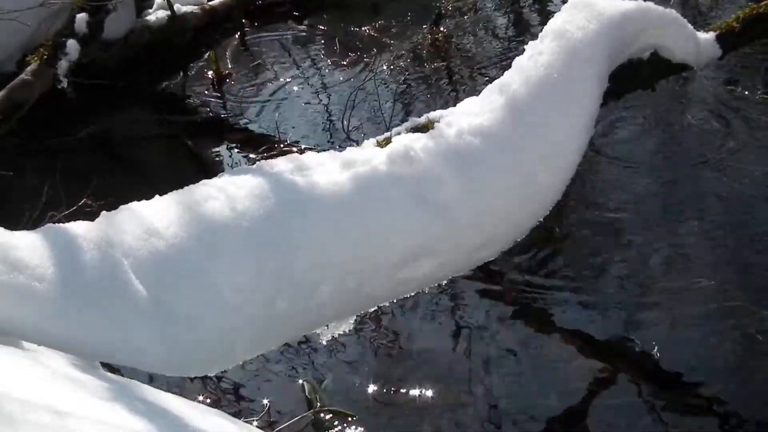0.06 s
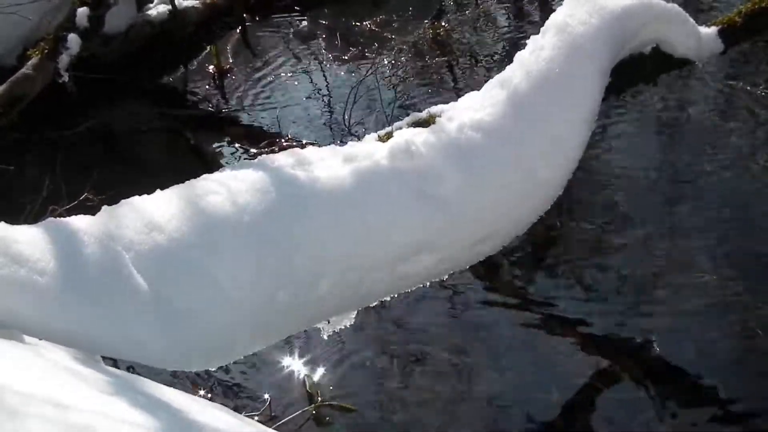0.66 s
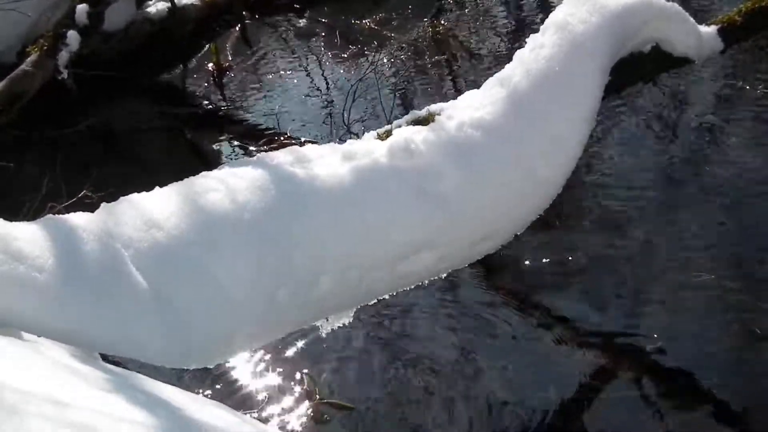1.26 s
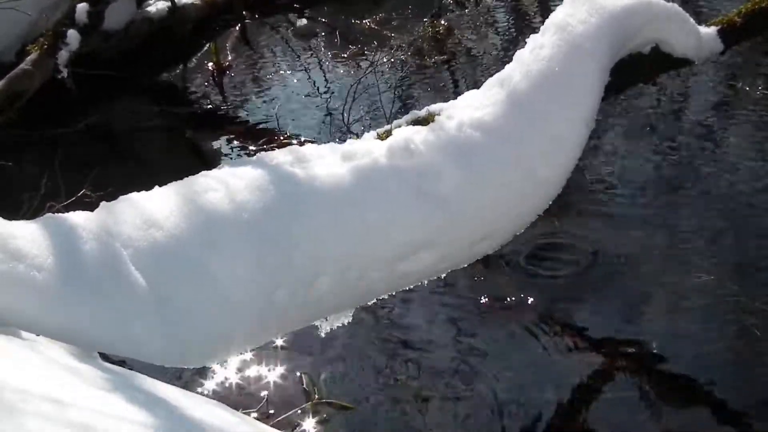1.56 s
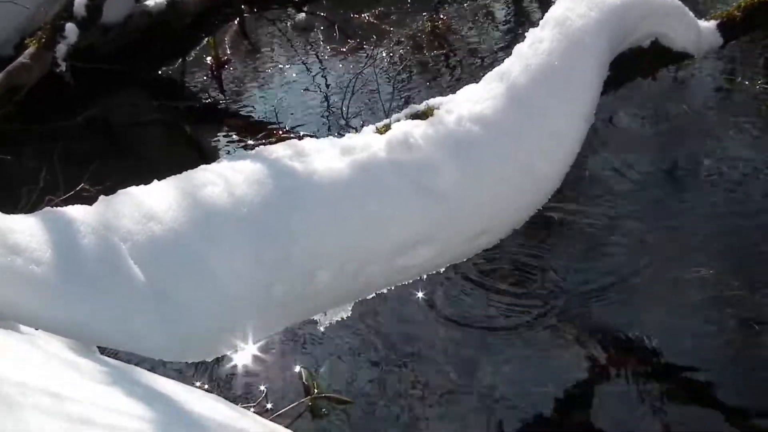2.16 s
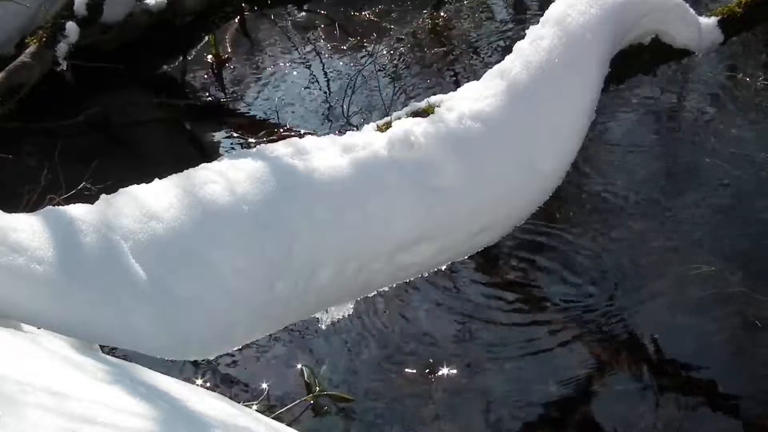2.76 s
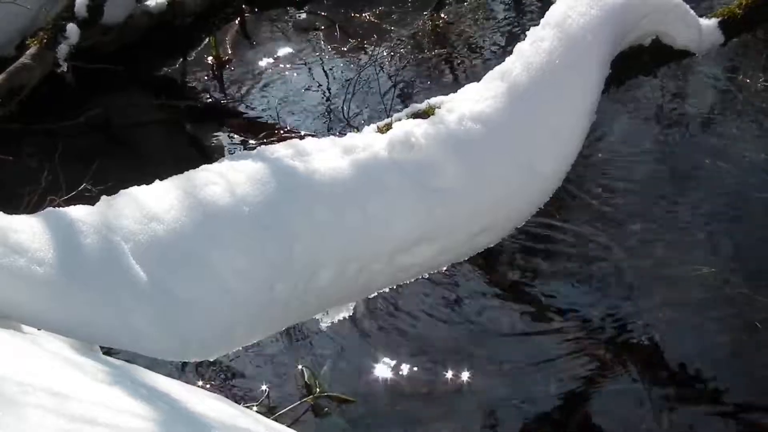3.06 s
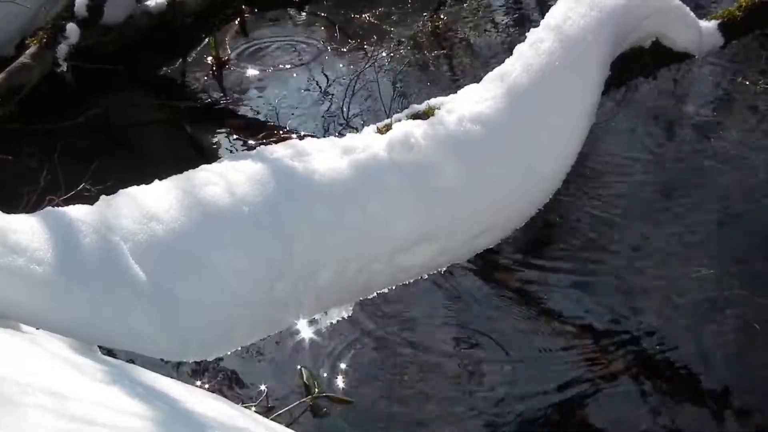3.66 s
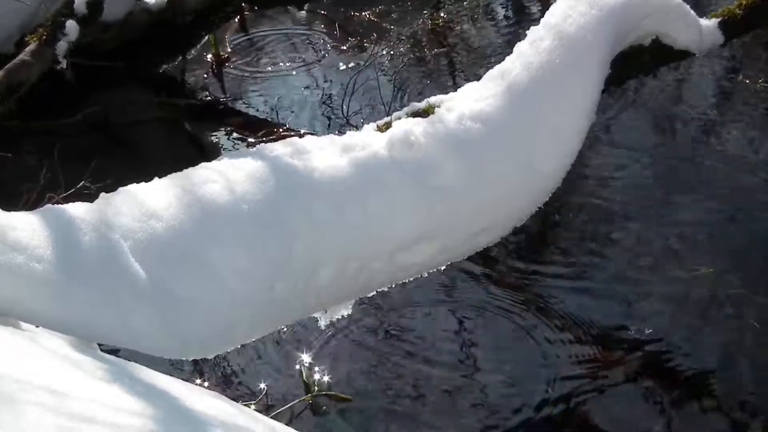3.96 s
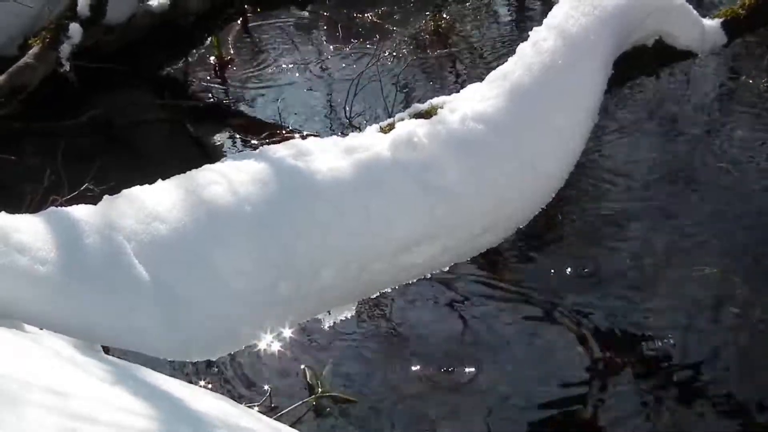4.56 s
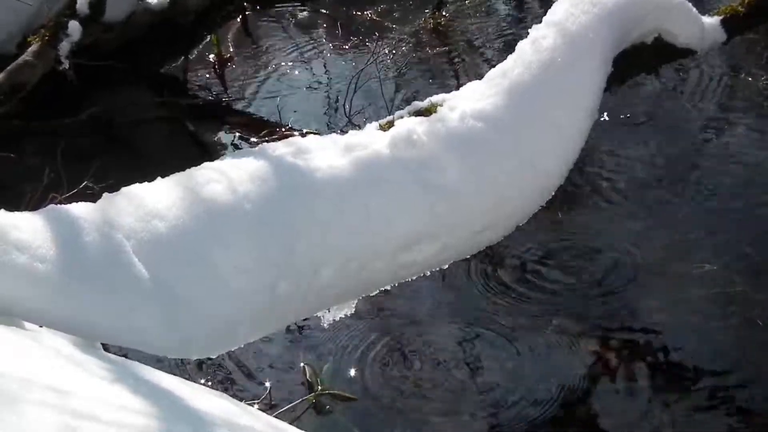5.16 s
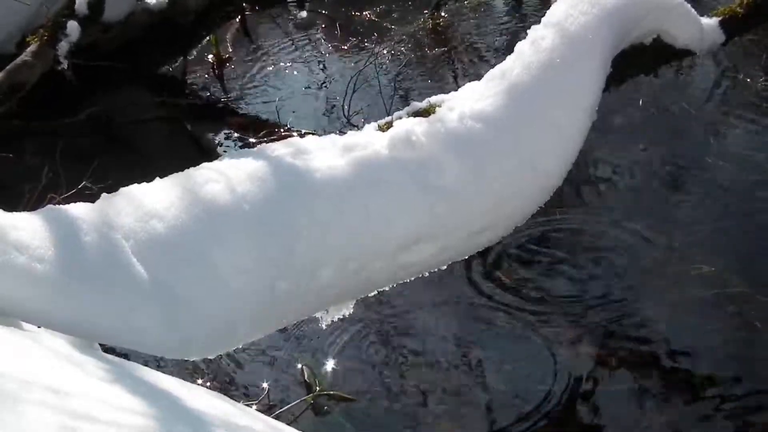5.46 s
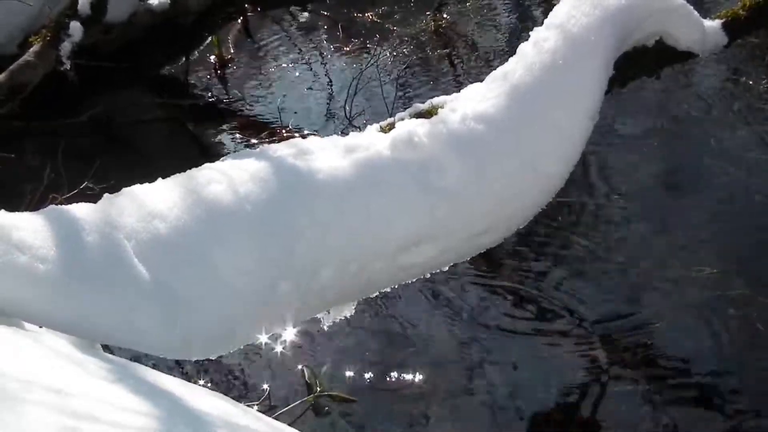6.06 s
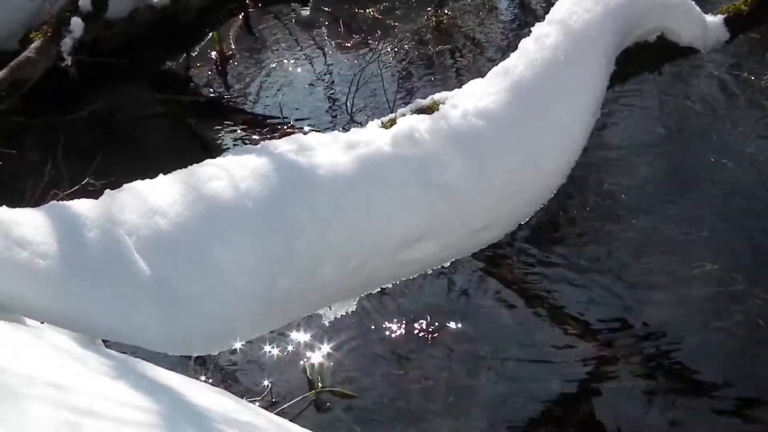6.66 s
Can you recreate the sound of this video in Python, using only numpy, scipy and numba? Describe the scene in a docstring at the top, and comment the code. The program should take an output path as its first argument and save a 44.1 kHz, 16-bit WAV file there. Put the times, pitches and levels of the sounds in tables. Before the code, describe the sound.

A distant stream hisses softly and steadily outdoors for the whole seven seconds or so. Faint drops of meltwater fall irregularly into a pool, making small ticks and short, bubbly plinks, with clearer ones at about 1.2, 2.5 and 3.8 seconds. A very faint, high camera motor whine pulses nearly four times a second throughout. At first, only light puffs of breeze touch the microphone. From about 3 seconds the wind rises, and by 4 seconds it is a loud, low, fluttering rumble with hard thumps, mostly on the right side. The strongest blows come at around 4.2, 4.7 and 5.4 to 6 seconds, and the water sound dips under each one. The wind eases briefly near 6.5 seconds, then gusts again at about 6.8 seconds, with a couple of sharp drips ticking through it.

```python
"""A far stream hisses under a faint breeze; a small camera motor ticks with a faint, high whine.
Meltwater drips from a snowy log into a pool: drops crack on the surface, some ring a trapped bubble.
Halfway through, the wind rises and its eddies buffet the right microphone port; the left is sheltered.
A limiter ducks the water under each hard blow."""
import sys
import numpy as np
from scipy import signal
from scipy.fft import rfft, irfft
from scipy.io import wavfile
from scipy.ndimage import uniform_filter1d
from numba import njit

SR = 44100
rng = np.random.default_rng(int(sys.argv[2]) if len(sys.argv) > 2 else 0)


def persist_wave(psi):
    """Save psi, clipped to +-1, as 16-bit WAV."""
    counts = np.round(np.clip(psi, -1, 1) * 32767).astype(np.int16)
    wavfile.write(sys.argv[1], SR, np.atleast_2d(counts).T)


N = 304290
T = np.arange(N) / SR
DROP_T = T[:SR // 6]

# stream spectrum: (frequency [Hz], relative density [dB])
STREAM_SPECTRUM = [(30, -8), (100, 3), (300, 4), (750, 0.5), (1100, 0.5), (1700, 1), (2800, 0), (3300, -3),
                   (3900, -1), (5000, -3.5), (6800, -2.5), (10000, -9), (14000, -21.5)]
# stream stereo image: (frequency [Hz], port correlation [0-1], left minus right [dB])
STREAM_IMAGE = [(60, 0.8, -3), (400, 0.54, 0), (1220, 0.63, -1.2), (2330, 0.18, -2), (4400, 0.39, 0.5),
                (8000, 0.15, 1), (15000, 0.1, -2)]
# breeze between gusts: (time [s], level [dB])
BREEZE_LEVELS = [(0, -51.5), (1.1, -49.5), (2.1, -47), (3.2, -43), (3.7, -27.5), (4.35, -17), (4.67, -19.5),
                 (5.22, -18.5), (5.7, -9.5), (6.05, -12), (6.44, -16.5), (6.9, -16.5)]
# gusts: (start [s], length [s], midpoint level [dB], swell start to end [dB], eddy size [ratio])
WIND_GUSTS = [(0.09, 0.045, -42, -5, 1.22), (0.274, .17, -37.5, -0.5, 1), (0.787, 0.15, -47, 1, 0.93),
              (1.5, .26, -40, -0.5, 1.05), (1.92, 0.046, -36, -3, 1.5), (2.215, 0.13, -38, 8, 0.95),
              (2.416, 0.53, -41, 1.5, 0.8), (3.084, 0.051, -27.5, 4, 0.91), (3.261, 0.15, -28, 5, 0.81),
              (3.481, 0.096, -21, -1, 0.87), (3.621, 0.082, -16, -2.5, 1.36),
              (3.762, 0.075, -14.5, 4, 1.05), (3.89, 0.35, -7, 5.5, 1.07), (4.296, 0.032, -9, -3, 0.99),
              (4.457, 0.15, -12.5, 1.5, 1.05), (4.721, 0.18, -7, -0.5, 0.99), (4.97, 0.075, -9, -0.5, 1.32),
              (5.343, 0.31, -4, 5, 0.8), (5.826, 0.17, -5.5, 9.5, 0.92), (6.105, .2, -10, 1, 1.05),
              (6.516, 0.21, -15, -12, 1.03), (6.746, 0.26, -9.5, 6.5, 1.06)]
# swirls curling round to the left port: (time [s], level [dB])
LEFT_SWIRLS = [(2.65, -43), (3.62, -39), (4.17, -24), (4.31, -12), (4.99, -20), (5.125, -16.5), (5.37, -27),
               (5.77, -14.5), (5.93, -16.5), (6.55, -27), (6.66, -38)]
# drops that trap a bubble:
# (time [s], bubble peak [dB], pitch [Hz], bubble t60 [s], splash level [dB], left minus right [dB])
BUBBLE_DROPS = [(0.3387, -41.5, 2180, 0.029, -42, -16), (0.4826, -46, 1800, .05, -52, -4),
                (.7941, -38, 2030, 0.034, -39, -16), (0.969, -41, 2730, 0.027, -39, -1),
                (1.2054, -27.5, 6140, 0.0067, -45, 14), (1.208, -30, 5500, 0.0087, -28.5, -10),
                (2.102, -38, 4600, 0.011, -39, -11), (2.378, -39, 1980, 0.024, -37.5, -18),
                (2.5139, -31.5, 1035, 0.094, -37, -8), (2.5636, -44, 2480, 0.033, -44, -18),
                (3.1336, -39, 1470, 0.077, -47, -5), (3.474, -41.5, 1690, 0.065, -48, -7),
                (3.79, -31, 2640, 0.028, -35, -12)]
# drops that only splash: (time [s], onset level [dB], centre [Hz], t60 [s], left minus right [dB])
SPLASH_DROPS = [(1.188, -42.5, 1400, .09, -1), (1.191, -47, 4970, 0.12, 12),
                (1.2079, -32.5, 2300, 0.017, -8), (1.210, -39, 574, 0.072, 0), (1.385, -39, 9000, 0.009, 0),
                (2.0994, -33, 5800, 0.0097, -9), (2.1351, -39, 6500, .008, -2),
                (2.8635, -41, 7000, .008, 0), (2.945, -39, 9500, .008, 0), (3.7131, -51, 6960, .008, -15),
                (3.9044, -39, 3440, 0.0084, -23), (6.301, -30, 8000, 0.007, 2),
                (6.818, -23.5, 6550, 0.0041, -11)]
# single hard eddies on the right port: (time [s], peak [dB], pitch [Hz])
VORTICES = [(3.925, -4, 325), (3.965, 3, 255), (4.103, 5.5, 198), (4.15, -0.5, 400), (4.168, 8.5, 222),
            (4.303, -2, 400), (4.520, 3, 220), (4.742, 10, 329), (4.884, -3, 243), (5.042, -3.5, 293),
            (5.338, -4, 333), (5.351, -0.5, 170), (5.38, 5.5, 202), (5.397, -3, 850), (5.597, -2, 695),
            (5.647, 12, 325), (5.869, 5, 209), (5.913, 8, 220), (5.954, 9, 220), (6.016, 8, 276),
            (6.168, 6.5, 204), (6.267, 2.5, 210), (6.829, 6, 205)]
# camera's notch filters against its motor noise: (centre [Hz], width [Hz])
MOTOR_NOTCHES = [(7850, 660), (8820, 850), (11750, 580)]


def undb(db):
    """Decibels to gain."""
    return 10 ** (np.asarray(db) / 20)


def unit_rms(x):
    """Scale to rms 1."""
    return x / np.sqrt(np.mean(x ** 2))


def wander(rate_hz):
    """Smooth random curve, rms 1, about rate_hz changes a second."""
    hold = max(2, int(SR / rate_hz))
    steps = np.repeat(rng.standard_normal(N // hold + 2), hold)
    return unit_rms(uniform_filter1d(uniform_filter1d(steps, hold), hold)[:N])


def pan(pan_db):
    """Port gains for a left-minus-right level."""
    return undb([[pan_db / 2], [-pan_db / 2]])


def place(out, time_s, sound, pan_db):
    """Mix a short sound into the stereo field."""
    start = int(time_s * SR)
    part = sound[:N - start]
    out[:, start:start + len(part)] += pan(pan_db) * part


def butter(x, hz, kind, order):
    """Butterworth low-pass or high-pass."""
    return signal.sosfilt(signal.butter(order, min(hz, .45 * SR), kind, fs=SR, output="sos"), x)


@njit
def moving_lowpass(x, hz, damping):
    """State-variable low-pass, corner set per sample."""
    y, band_state, low_state = np.empty(len(x)), 0., 0.
    for i in range(len(x)):
        g = np.tan(np.pi * min(hz[i], 8000.) / SR)
        band = (band_state + g * (x[i] - low_state)) / (1 + g * (g + damping))
        y[i] = low_state + g * band
        band_state, low_state = 2 * band - band_state, 2 * y[i] - low_state
    return y


def stream(level_db=-45, flicker_db=0.8, flicker_hz=18):
    """Far running water: countless bubbles merge into a hiss whose half-octave bands flicker."""
    log_hz = np.log(np.maximum(np.fft.rfftfreq(N, 1 / SR), 1))
    hz, db = np.transpose(STREAM_SPECTRUM)
    colour = undb(np.interp(log_hz, np.log(hz), db))
    hz, *image = np.transpose(STREAM_IMAGE)
    correlation, pan_db = (np.interp(log_hz, np.log(hz), column) for column in image)
    sign = np.array([[1], [-1]])
    mid, side = rfft(rng.standard_normal((2, N)))
    ports = np.sqrt(1 + correlation) * mid + sign * np.sqrt(1 - correlation) * side
    ports = ports * colour * undb(sign * pan_db / 2)
    band = np.clip(np.floor(2 * (log_hz - np.log(250)) / np.log(2)), 0, 10)
    hiss = sum(irfft(ports * (band == k), N) * undb(flicker_db * wander(flicker_hz))
               for k in np.unique(band))
    return undb(level_db) * unit_rms(hiss)


def gusts(attack_s=0.021, release_s=0.039):
    """Wind pressure and eddy size: each gust rises, swells or sags, then dies into the breeze."""
    power = undb(np.interp(T, *np.transpose(BREEZE_LEVELS))) ** 2
    weighted_size = power.copy()
    for start_s, length_s, db, swell_db, size in WIND_GUSTS:
        age_s = T - start_s
        edges = np.exp(np.minimum(age_s, 0) / attack_s - np.maximum(age_s - length_s, 0) / release_s)
        progress = np.clip(age_s / length_s, 0, 1)
        gust_power = (edges * undb(db + swell_db * (progress - .5))) ** 2
        power += gust_power
        weighted_size += size * gust_power
    return np.sqrt(power), weighted_size / power


def turbulence(corner_hz, flutter_db=1.7, flutter_hz=60, brightening=0.39, damping=1.524, crest=6.0):
    """Eddies on one port; a quick swirl is both louder and brighter."""
    swirl_db = flutter_db * wander(flutter_hz)
    hz = corner_hz * undb(brightening * swirl_db)
    eddies = rng.standard_normal(N) / np.sqrt(hz)
    eddies = moving_lowpass(moving_lowpass(eddies, hz, damping), hz, damping)
    # eddies far larger than the port hardly move it; faster wind carries them past sooner
    bass_cut_hz = 80 * (corner_hz / 250) ** 0.86
    eddies = eddies - moving_lowpass(eddies, bass_cut_hz, damping=1.14)
    eddies = unit_rms(butter(eddies, 36, "high", order=1)) * undb(swirl_db)
    return crest * np.tanh(eddies / crest)  # wind speed bounds eddy pressure


def wind(left_db=-24, right_db=-0.33, left_corner_ratio=0.94, swirl_sigma_s=0.025):
    """The right port faces the wind; the sheltered left rumbles lower and catches stray swirls."""
    pressure, eddy_size = gusts()
    corner_hz = 415 * pressure ** 0.32 / eddy_size  # faster wind sheds finer eddies
    swirls = sum(undb(db) * np.exp(-.5 * ((T - time_s) / swirl_sigma_s) ** 2)
                 for time_s, db in LEFT_SWIRLS)
    left = np.hypot(undb(left_db) * pressure, swirls) * turbulence(left_corner_ratio * corner_hz)
    right = undb(right_db) * pressure * turbulence(corner_hz) + buffets()
    return np.array([left, right])


def motor(first_s=0.0689, period_s=.27243, on_s=.018, whine_hz=10978, level_db=-46, pan_db=3):
    """The camera's motor whines for an instant at even intervals."""
    running = (T - first_s) % period_s < on_s
    envelope = uniform_filter1d(running.astype(float), size=50)
    return undb(level_db) * pan(pan_db) * envelope * np.sin(2 * np.pi * whine_hz * T)


def splash(centre_hz, t60_s, edge_ratio=1.63):
    """A drop cracks on the surface: band noise decaying from rms 1."""
    fade = np.exp(-np.log(1000) * DROP_T / t60_s)
    burst = fade * rng.standard_normal(len(fade))
    burst = butter(burst, centre_hz / edge_ratio, "high", order=2)
    burst = butter(burst, centre_hz * edge_ratio, "low", order=3)
    return unit_rms(burst) * np.sqrt(np.mean(fade ** 2))


def bubble(hz, t60_s, overshoot=0.073, settle_s=0.0024):
    """A trapped bubble rings; its pitch settles as it is pulled under."""
    pitch_hz = hz * (1 + overshoot * np.exp(-DROP_T / settle_s))
    fade = np.exp(-np.log(1000) * DROP_T / t60_s)
    return fade * np.sin(2 * np.pi * np.cumsum(pitch_hz) / SR)


def near_drips(crack_hz=4500, crack_t60_s=0.0067):
    """Near drops: each cracks on the pool, some ring a bubble."""
    out = np.zeros((2, N))
    for time_s, db, hz, t60_s, splash_db, pan_db in BUBBLE_DROPS:
        drop = undb(db) * bubble(hz, t60_s) + undb(splash_db) * splash(crack_hz, crack_t60_s)
        place(out, time_s, drop, pan_db)
    for time_s, db, hz, t60_s, pan_db in SPLASH_DROPS:
        place(out, time_s, undb(db) * splash(hz, t60_s), pan_db)
    return out


def far_drips(count=60, median_ring_db=-51, median_tick_db=-47, scatter_db=2.5, median_hz=2300):
    """Faint drops all over the pool, each a tick and a ringing bubble."""
    out = np.zeros((2, N))
    times_s = rng.uniform(0, T[-1], count)
    for time_s, (size, pitch, side) in zip(times_s, rng.standard_normal((count, 3))):
        ring = undb(median_ring_db) * bubble(median_hz * np.exp(.35 * pitch), t60_s=0.048)
        tick = undb(median_tick_db) * splash(centre_hz=8000, t60_s=.005)
        place(out, time_s, undb(scatter_db * size) * (ring + tick), pan_db=3 * side)
    return out


def buffets(lead_cycles=0.28, ring_cycles=0.46, cutoff_ratio=3.35):
    """A passing vortex sucks briefly, pushes hard and swings out."""
    out = np.zeros(N)
    offset_s = np.arange(-SR // 50, SR // 50) / SR
    for time_s, db, hz in VORTICES:
        envelope = np.exp(-np.abs(hz * offset_s) / np.where(offset_s < 0, lead_cycles, ring_cycles))
        push = envelope * np.sin(2 * np.pi * hz * offset_s)
        push = butter(push, cutoff_ratio * hz, "low", order=2)
        out += undb(db) * np.interp(T, time_s + offset_s, push / push.max(), left=0, right=0)
    return out


@njit
def follow_peak(x, attack_s, release_s):
    """The limiter's detector: quick to rise, slow to let go."""
    y, level = np.empty(len(x)), 0.
    for i in range(len(x)):
        level += (x[i] - level) / (SR * (attack_s if x[i] > level else release_s))
        y[i] = level
    return y


def scene():
    """Water, wind and motor at the two ports."""
    return stream() + near_drips() + far_drips() + wind() + motor()


def record(dry, threshold_db=-1.0, attack_s=0.00094, release_s=0.18, notch_db=-24, top_hz=15100):
    """One limiter ducks both ports; notches follow, the fastest peaks overload, the top is cut."""
    peak = follow_peak(np.abs(dry).max(axis=0), attack_s, release_s)
    out = dry / np.maximum(peak / undb(threshold_db), 1)
    for hz, width_hz in MOTOR_NOTCHES:
        b, a = signal.iirnotch(hz, hz / width_hz, fs=SR)
        notched = signal.lfilter(b, a, signal.lfilter(b, a, out))
        out = undb(notch_db) * out + (1 - undb(notch_db)) * notched
    lowpass = signal.ellip(8, .2, 70, top_hz, fs=SR, output="sos")
    return signal.sosfilt(lowpass, np.clip(out, -1, 1))


dry = scene()
out = record(dry)
persist_wave(out)
```